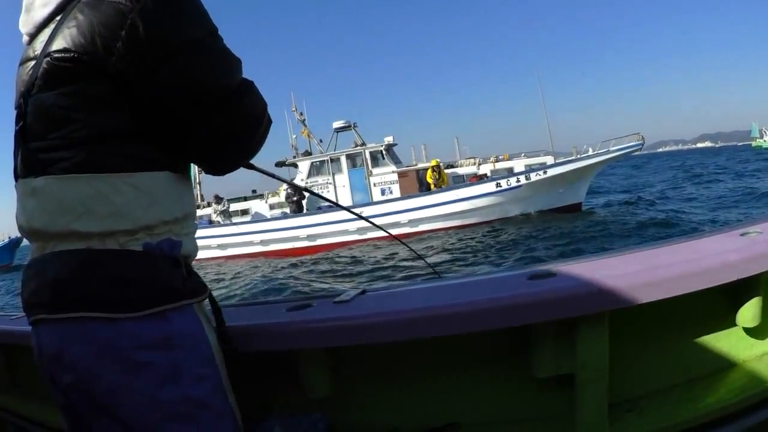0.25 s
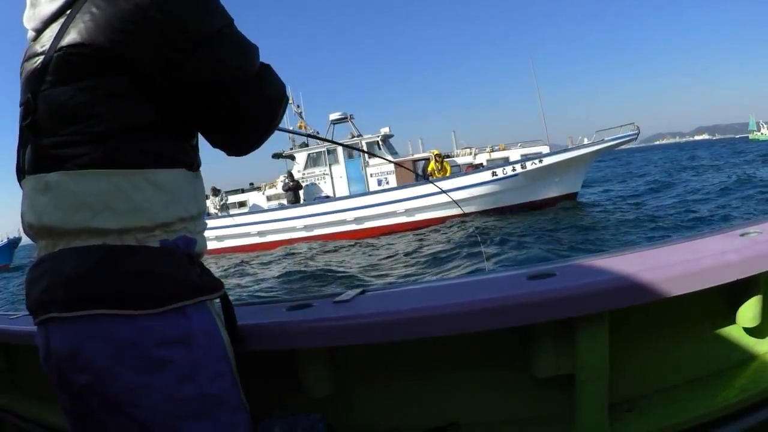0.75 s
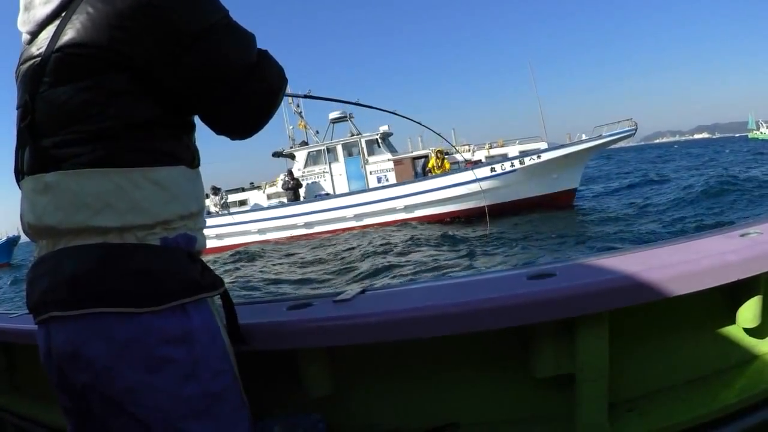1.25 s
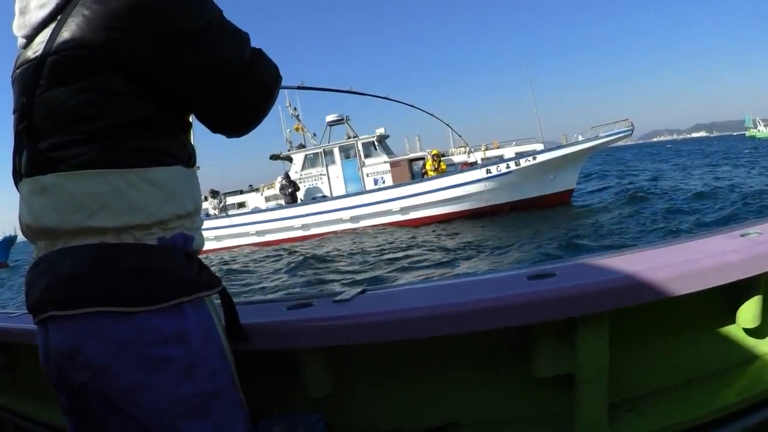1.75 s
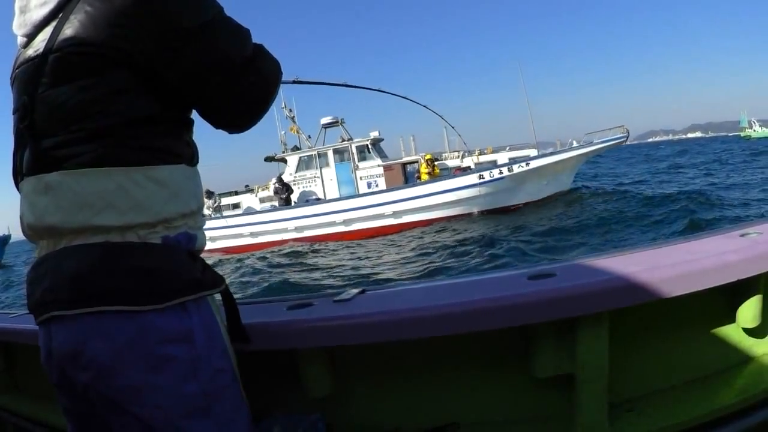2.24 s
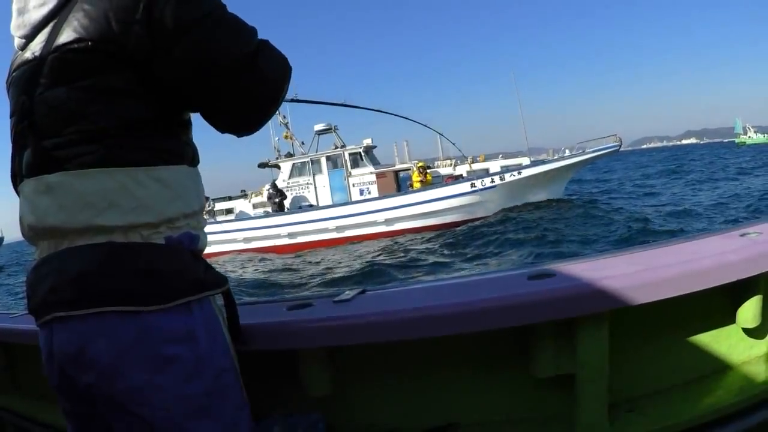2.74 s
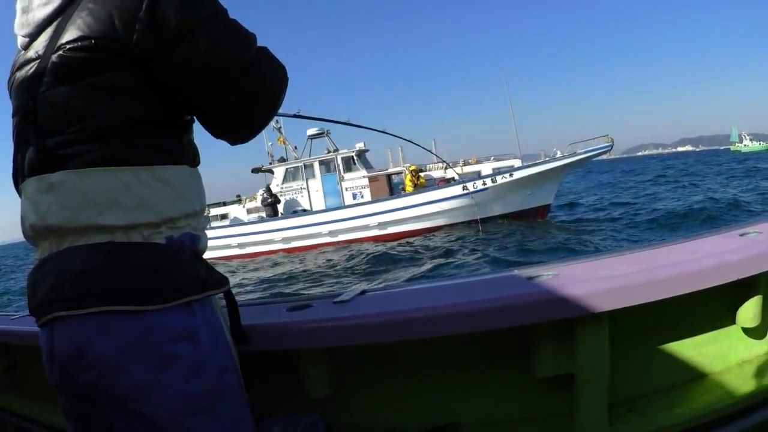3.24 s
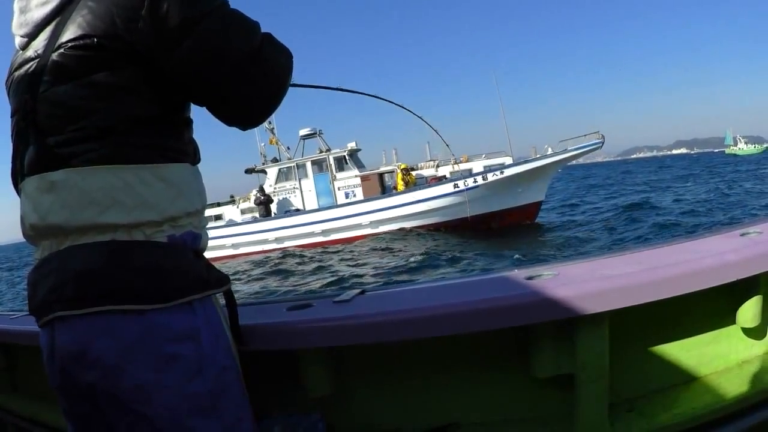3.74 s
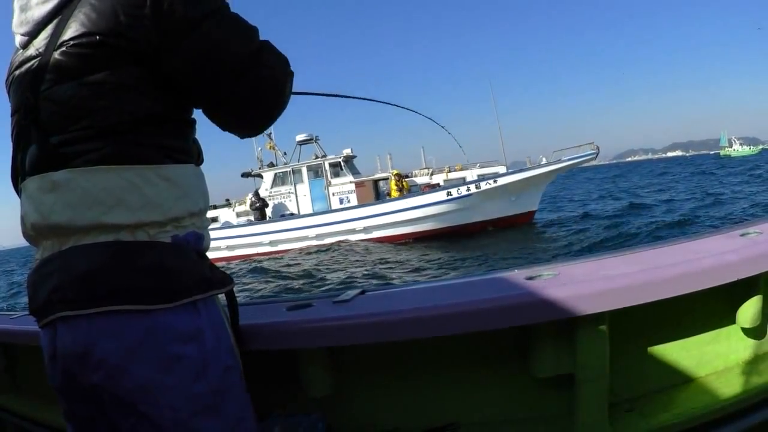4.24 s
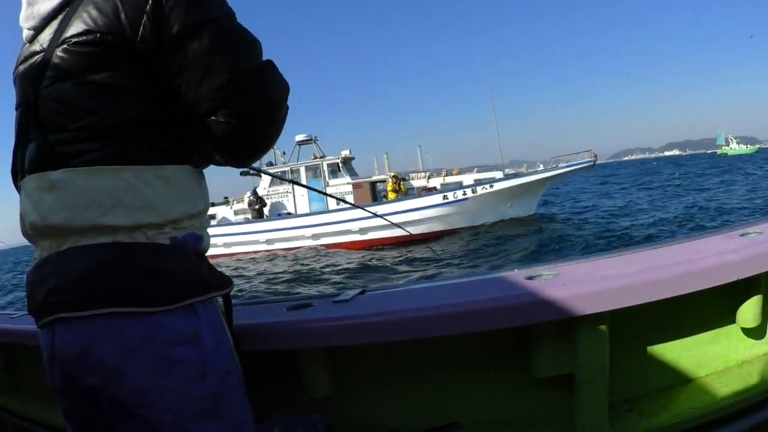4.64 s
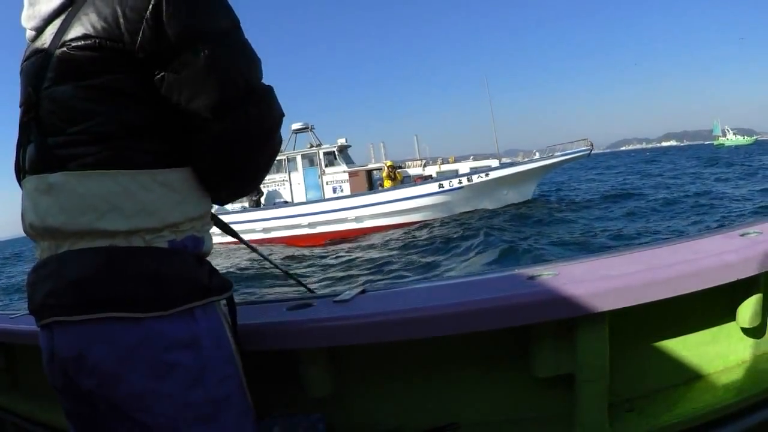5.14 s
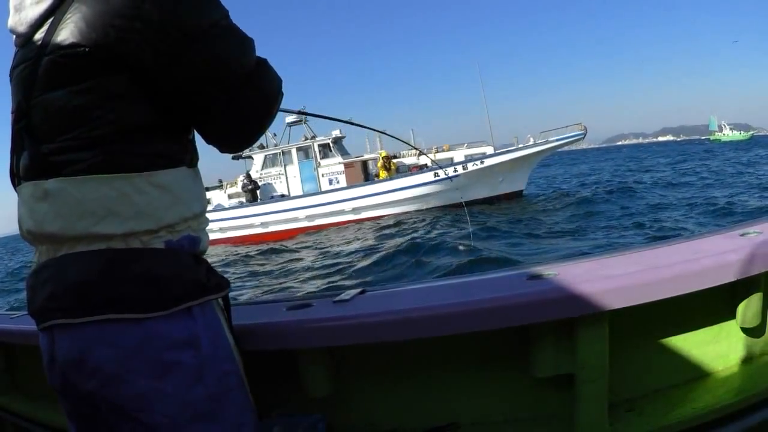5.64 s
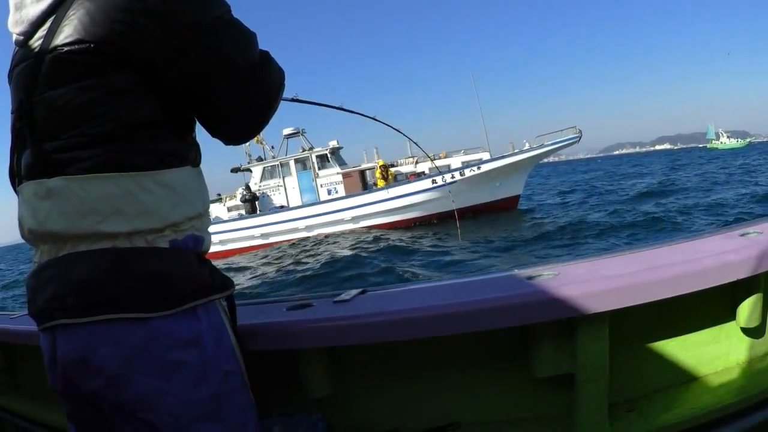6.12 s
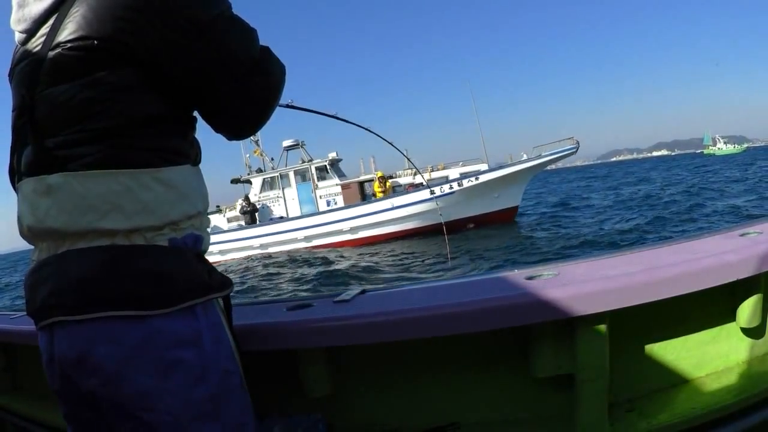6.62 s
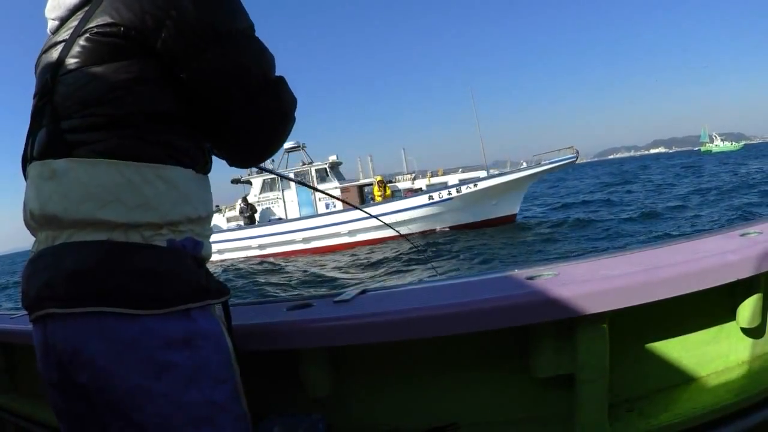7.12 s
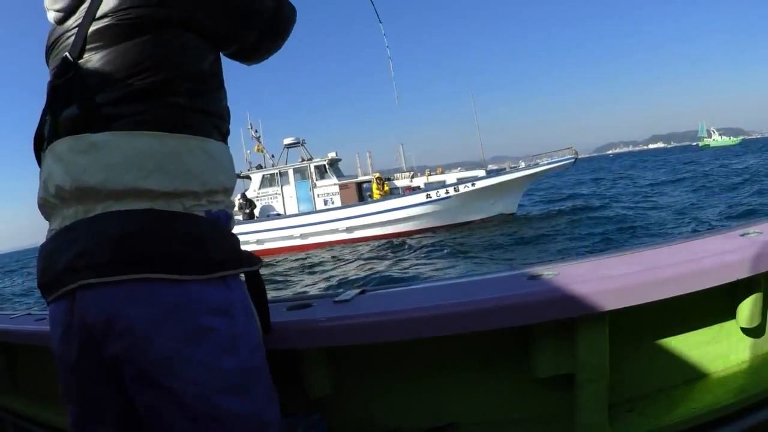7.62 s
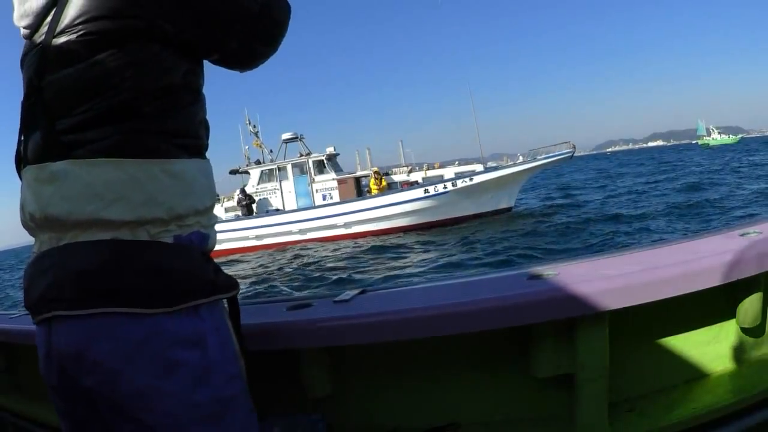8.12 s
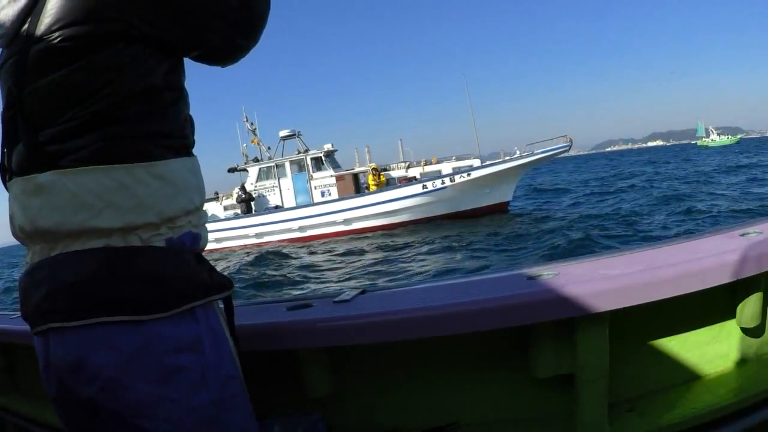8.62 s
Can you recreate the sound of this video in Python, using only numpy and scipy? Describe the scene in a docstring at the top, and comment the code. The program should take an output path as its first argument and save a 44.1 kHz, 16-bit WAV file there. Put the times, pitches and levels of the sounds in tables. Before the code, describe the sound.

On an open fishing boat deck, a diesel idles under a heavy low rumble and dull roar of wind and water. Two waves slap the hull early; small tackle ticks sharply. A hard knock comes before four seconds, then the engine shifts into gear and drones steadier. From about five seconds an electric reel whines thinly to the end, with spray hiss and a late rattle. The small microphone is close, bass-heavy and muffled.

```python
"""A fishing boat's diesel idles at sea, then speeds up in gear: sine multiples of the firing rate
and humming hull panels (narrow noise). Wind and water rumble and roar as shaped noise, spray hisses,
waves slap the hull as falling sines, an electric reel whines, tackle ticks, knocks and squeaks.
A small microphone behind a narrow port hears it; its gain control ducks after sharp treble."""
import sys
import numpy as np
from scipy import signal
from scipy.io import wavfile
from scipy.ndimage import uniform_filter1d, minimum_filter1d

SR = 44100
rng = np.random.default_rng(int(sys.argv[2]) if len(sys.argv) > 2 else 0)


def transcribe(signal):
    """Save signal, clipped to [-1, 1], as a 16-bit WAV file at the path in sys.argv[1]."""
    frames = np.atleast_2d(signal).T
    limited = np.clip(frames, -1, 1)
    pcm = np.round(limited * 32767).astype(np.int16)
    wavfile.write(sys.argv[1], SR, pcm)


N = 391166
T = np.arange(N) / SR

# engine, idle to gear to easing throttle: t/s, second multiple of firing rate f/Hz, its level/dB
ENGINE_SPEED = [(0, 45.1, -31.5), (3.68, 45.1, -41), (3.94, 50.6, -29), (4.1, 51.8, -24.5),
                (5.1, 51.8, -27.5), (5.68, 51.8, -31), (6.0, 51.8, -24), (6.3, 51.8, -23),
                (6.65, 51.8, -24.5), (8.15, 51.8, -24), (8.36, 50.6, -29), (8.87, 49.3, -35)]
# microphone port response: f/Hz, gain/dB
PORT_RESPONSE = [(4000, 3.5), (5000, 13.5), (6300, 10.5), (7200, 13.5), (8300, -5.5), (9000, 2),
                 (9900, -8.5), (10800, -3), (12300, -3), (13300, -37.5), (14300, -1.5), (15700, -10)]


def amp(db):
    """Gain of a level in dB."""
    return 10 ** (np.asarray(db) / 20)


def unit(x):
    """Scales to rms 1."""
    return x / np.sqrt(np.mean(x ** 2) + 1e-20)


def read(points, hz):
    """Value of a spectrum at hz, interpolated over log frequency."""
    f, value = np.transpose(points)
    return np.interp(np.log(hz + 1), np.log(f + 1), value)


def curves(rows, t):
    """Columns of a table, interpolated at the times t."""
    s, *columns = np.transpose(rows)
    return [np.interp(t, s, c) for c in columns]


def smooth(x, span):
    """Two moving averages over span samples."""
    return uniform_filter1d(uniform_filter1d(x, size=span), size=span)


def in_gear(t):
    """0 at idle, 1 in gear, judged from the second multiple of the firing rate."""
    idle_hz, gear_hz = 45.2, 48.5
    return np.clip((curves(ENGINE_SPEED, t)[0] - idle_hz) / (gear_hz - idle_hz), 0, 1)


def add(mix, s, sound):
    """Mixes a sound in at s seconds, cut at the end of the mix."""
    part = mix[round(s * SR):][:len(sound)]
    part += sound[:len(part)]


def fuzzy_tone(hz, width_hz, size=N):
    """Narrow noise of rms 1 that follows the curve hz: slow complex noise on a carrier."""
    r = np.exp(-np.pi * width_hz / SR)
    noise = rng.standard_normal(size) + 1j * rng.standard_normal(size)
    slow = signal.lfilter([1], [1, -2 * r, r * r], noise)
    carrier = np.exp(2j * np.pi * np.cumsum(hz + np.zeros(size)) / SR)
    return unit((slow * carrier).real)


def wash(shape_db, size, patchy_db, flicker_db):
    """Noise of rms 1 and spectrum shape_db(hz, t), even in power but for random patches and wide flicker."""
    hop = size // 4
    t, hz = np.arange(N // hop + 5) * hop / SR, np.fft.rfftfreq(size, 1 / SR)
    a, b, patches = rng.standard_normal((len(t), len(hz), 3)).T
    patches = uniform_filter1d(patches, size=8, axis=0)
    patches = unit(uniform_filter1d(patches, size=8, axis=1))
    flicker = unit(uniform_filter1d(rng.standard_normal(len(t)), size=4))
    shape = amp(shape_db(hz[:, None], t))
    shape = shape / np.sqrt((shape ** 2).sum(0))  # equal power in every frame
    frames = (a + 1j * b) * shape * amp(patchy_db * patches + flicker_db * flicker)
    return unit(signal.istft(frames, nperseg=size, noverlap=size - hop)[1][:N])


def deck():
    """Wind and water: rumble and roar change colour in gear; the roar throbs at the firing rate."""
    # t/s, hull rumble level/dB, roar level/dB
    deck_levels = [(0, -16.5, -16.5), (1.2, -17.5, -17), (1.58, -18, -19.5), (1.7, -18, -18),
                   (3.05, -16.5, -17), (3.64, -16.5, -17), (3.672, -21, -17), (3.75, -16, -17.5),
                   (3.85, -20.5, -21), (4.1, -23, -22.5), (4.45, -19.5, -24), (4.8, -24, -24.5),
                   (5.18, -17, -21), (5.62, -19.5, -22), (6.05, -17, -20.5), (6.3, -19.5, -22.5),
                   (6.8, -21, -22), (7.4, -19, -20.5), (7.5, -20.5, -22), (7.8, -21.5, -21),
                   (8.4, -18.5, -22), (8.87, -21.5, -22)]
    # spectra at idle and in gear: f/Hz, relative density/dB per Hz
    rumble_idle = [(18, -51), (30, -14), (80, -8.5), (146, -4.5), (216, -0.5), (347, -12.5), (400, -12),
                   (520, -36.5), (880, -120)]
    rumble_gear = [(20, -48), (36, -33), (46, -3), (62, -2), (72, -24), (97, -1), (124, 1), (156, -1),
                   (296, -3), (340, -16.5), (400, -15), (520, -58)]
    roar_idle = [(180, -25), (300, -2.5), (396, -16), (438, -6), (572, -6), (647, -6.5), (765, -2),
                 (874, -9), (1120, -10), (1840, -19.5), (2130, -23), (2720, -29), (4300, -48.5),
                 (5590, -88.5), (9460, -120)]
    roar_gear = [(180, -23), (300, -4.5), (347, -13), (479, -8.5), (512, -8.5), (605, -11.5), (669, -8.5),
                 (914, -13.5), (1260, -15.5), (2850, -31.5), (4300, -62), (5590, -97), (9460, -120)]
    gust_s, gust_rms_db, throb_depth = 0.038, 0.6, 0.058

    def blend(idle, gear):
        return lambda hz, t: read(idle, hz) + in_gear(t) * (read(gear, hz) - read(idle, hz))

    rumble_db, roar_db = curves(deck_levels, T)
    gust_db = gust_rms_db * unit(smooth(rng.standard_normal(N), round(gust_s * SR)))
    throb = 1 + throb_depth * np.cos(np.pi * np.cumsum(curves(ENGINE_SPEED, T)[0]) / SR)
    rumble = wash(blend(rumble_idle, rumble_gear), size=4096, patchy_db=0.37, flicker_db=1.23)
    roar = wash(blend(roar_idle, roar_gear), size=1024, patchy_db=0.33, flicker_db=0.46)
    return amp(gust_db) * (amp(rumble_db) * rumble + amp(roar_db) * roar * throb)


def hiss():
    """Spray, line and rod: wide hiss with a softer top octave, a rod swish and fine random drops."""
    # t/s, hiss level/dB
    hiss_levels = [(0, -47), (.35, -51.5), (1.7, -51.5), (2.3, -49), (2.75, -52.5), (3.4, -49.5),
                   (3.75, -54.5), (4.35, -58), (4.65, -55), (4.85, -56), (5.9, -43.5), (6.5, -48.5),
                   (6.95, -45), (7.8, -45.5), (8.3, -45.5), (8.5, -48.5), (8.87, -45.5)]
    # upward swish of the rod: t/s, rise/dB, width/s
    rod_swish = (7.47, 10, .065)
    top_octave_db, sea_db, sea_share = -1.5, -54, 0.74
    drops_per_s, drop_decay_samples = 60, 250

    def level_db(t):
        s, rise_db, width_s = rod_swish
        return curves(hiss_levels, t)[0] + rise_db * np.exp(-((t - s) / width_s) ** 2)

    def tilt(hz, t):
        # the low hiss of the sea swells less
        sea = sea_share * (sea_db - level_db(t)) * np.clip((6000 - hz) / 600, 0, 1)
        top = top_octave_db * np.clip((hz - 9000) / 1500, 0, 1)
        low_cut = -30 * np.clip((3800 - hz) / 1500, 0, 3)
        return sea + top + low_cut

    drop_gain = amp(1.6 * np.minimum(rng.exponential(1, N), 4))
    drops = drop_gain * (rng.random(N) < drops_per_s / SR)
    spatter = 1 + 0.39 * signal.lfilter([1], [1, -np.exp(-1 / drop_decay_samples)], drops)
    return amp(level_db(T)) * wash(tilt, size=256, patchy_db=0.7, flicker_db=0.5) * spatter


def slaps():
    """Waves slap the hull: the trapped water pocket grows, so each decaying sine drops quickly in pitch."""
    # t/s, peak/dB, final pitch f/Hz, t60/s
    wave_slaps = [(1.429, -9, 170, 0.044), (1.4629, -0.5, 217, 0.11), (5.219, -6, 193, 0.055),
                  (5.978, -13, 149, .04)]
    out, t = np.zeros(N), np.arange(4000) / SR
    for s, db, hz, t60_s in wave_slaps:
        turns = np.cumsum(hz + 450 * np.exp(-t / 0.0016)) / SR
        attack = np.minimum(t / 0.00039, 1)
        add(out, s, amp(db - 60 * t / t60_s) * attack * np.sin(2 * np.pi * turns))
    return out


def knocks():
    """Tackle knocks and scrapes as decaying narrow noise, and a squeak as a few harmonics."""
    # t/s, level/dB, f/Hz, width/Hz, t60/s
    tackle_knocks = [(3.39, -29.5, 2960, 600, 0.13), (3.716, -13, 1132, 890, 0.24),
                     (4.165, -41, 4700, 1200, .1), (6.12, -34, 2920, 200, .08),
                     (8.422, -37, 3430, 1500, .09), (8.422, -23, 2240, 895, 0.071),
                     (8.44, -23, 2630, 1100, 0.1), (8.44, -42, 3510, 1000, 0.072)]
    # t/s, length/s, fundamental f/Hz
    squeak = (.742, .07, 622)
    # multiple of the fundamental, level/dB
    squeak_multiples = [(3, -27.5), (4, -44), (5, -44)]
    out, t = np.zeros(N), np.arange(12000) / SR
    for s, db, hz, width_hz, t60_s in tackle_knocks:
        envelope = amp(db - 60 * t / t60_s) * np.minimum(t / (0.023 * t60_s), 1)
        add(out, s, envelope * fuzzy_tone(hz, width_hz, size=len(t)))
    s, length_s, hz = squeak
    t = np.arange(0, length_s, 1 / SR)
    tone = sum(amp(db) * np.sin(2 * np.pi * k * hz * t) for k, db in squeak_multiples)
    add(out, s, signal.windows.tukey(len(t), .4) * tone)
    return out


def ticks():
    """Tackle and drops near the port: a 1.4 ms ringing snap, brighter when harder, then a duller rattle."""
    # t/s, snap level/dB, ring f/Hz, rattle level/dB
    port_ticks = [(0.1082, -31, 6630, -43.5), (1.5434, -32, 6900, -32), (1.6003, -32, 7390, -39.5),
                  (1.8936, -29, 7400, -36), (2.1755, -35.5, 6770, -44), (2.4039, -34, 7350, -37),
                  (2.7367, -31.5, 7100, -34), (3.2705, -31, 7400, -45.5), (3.6578, -13.5, 8000, -22),
                  (4.163, -18, 14360, -35), (4.6029, -37, 6680, -42), (6.2193, -37, 7300, -38.5),
                  (6.7256, -36.5, 7100, -41.5), (6.7894, -30, 7140, -40.5), (7.637, -37, 7210, -42),
                  (7.8506, -36.5, 7260, -38.5), (8.09, -33, 7380, -35), (8.1843, -36, 7100, -39.5),
                  (8.422, -30.5, 6990, -24), (8.4394, -28, 6980, -32), (8.7316, -37.5, 7250, -45)]
    rattle_t60_s, hard_db, longer_s_per_db = 0.0855, -20, 0.007125  # harder snaps rattle longer
    out, t = np.zeros(N), np.arange(6000) / SR
    noises = rng.standard_normal((len(port_ticks), len(t)))
    short = np.exp(-(t / .0014) ** 4)
    attack = np.minimum(t / 0.00014, 1)
    for (s, db, hz, rattle_db), noise in zip(port_ticks, noises):
        ring = amp(-read(PORT_RESPONSE, hz)) * np.sin(2 * np.pi * hz * t)  # offsets the port gain
        bright = amp(.5 * (db + 10.0)) * np.diff(np.diff(noise, prepend=0), prepend=0)
        snap = amp(db) * short * (ring + 0.3 * bright)
        t60_s = rattle_t60_s + longer_s_per_db * max(db - hard_db, 0)
        dull = np.diff(uniform_filter1d(noise, size=3), prepend=0)
        rattle = amp(rattle_db - 60 * t / t60_s) * dull
        add(out, s, attack * (snap + rattle))
    return out


def reel():
    """Reel motor: a thin gear-mesh whine, noise bands at multiples of it, spool hum and case buzz."""
    # mesh pitch sags under each pull, creeps up as the load lightens: t/s, mesh f/Hz, level/dB
    mesh = [(5.05, 3117, -57), (5.2, 3400, -58), (5.34, 3400, -49), (5.52, 3362, -43), (5.68, 3420, -50),
            (6.03, 3464, -48), (6.3, 3445, -49), (6.44, 3402, -47), (6.92, 3475, -47.5), (7.05, 3451, -47),
            (7.4, 3505, -48), (7.7, 3498, -49.5), (8.07, 3535, -49), (8.25, 3505, -48), (8.68, 3528, -48.5),
            (8.87, 3500, -47.5)]
    # fuzzy bands: multiple of mesh pitch, width/Hz, level relative to the smoothed mesh/dB
    mesh_bands = [(1.07, 120, -27.5), (2.06, 90, -11), (2.6, 300, -8), (3.07, 300, -9)]
    # blurred spool hum under load: t/s, f/Hz, level/dB
    spool = [(5.3, 2230, -58), (5.7, 2260, -43), (7.15, 2275, -43), (7.5, 2260, -58), (8.87, 2260, -62)]
    # t/s, case noise level/dB
    case_levels = [(4.9, -51), (5.5, -49), (5.8, -39.5), (6.4, -42.5), (7.05, -40.5), (7.4, -41),
                   (8.3, -44), (8.55, -47), (8.87, -51)]

    def case_shape(f, t):
        return -16 * abs(np.log2((f + 1) / 2300)) ** 2 + 0 * t

    hz, db = curves(mesh, T)
    hz = hz + 6 * unit(smooth(rng.standard_normal(N), 3000))  # wander, 6 Hz rms
    on = np.clip((T - mesh[0][0]) / 0.088, 0, 1)
    out = amp(db) * (1.05 * np.sin(2 * np.pi * np.cumsum(hz) / SR) + 0.32 * fuzzy_tone(hz, 52))
    loaded = np.clip((T - 5.3) / 0.5, .2, 1)  # bands grow as the line goes taut
    steady_db = uniform_filter1d(db, size=30000)
    for k, width_hz, band_db in mesh_bands:
        out += amp(steady_db + band_db) * loaded * fuzzy_tone(k * hz, width_hz)
    spool_hz, spool_db = curves(spool, T)
    out += amp(spool_db) * fuzzy_tone(spool_hz, 94)
    case = wash(case_shape, size=512, patchy_db=3.0, flicker_db=-1.5)
    out += amp(curves(case_levels, T)[0]) * case
    return on * out


def engine():
    """Diesel: clean low multiples of the firing rate, and hull panels humming around fixed pitches."""
    # other multiples: multiple of firing rate, level at idle/dB, level in gear/dB
    orders = [(1, -56, -56), (3, -37, -40), (5, -30, -27), (6, -41, -51)]
    # seventh multiple, booming in swells at idle: t/s, level/dB
    boom = [(0, -19), (.5, -44), (1, -22), (1.4, -21), (1.75, -31), (2, -28), (2.75, -38), (3, -23),
            (3.5, -18), (3.7, -25), (8.87, -63)]
    # panels shaken by the engine: f/Hz, width/Hz, level at idle/dB, level in gear/dB
    panels = [(80.7, 6.1, -30, -29.5), (128.5, 9, -25.5, -36), (146.5, 24, -23.5, -50), (195, 11, -26, -41),
              (316, 12.5, -44, -38), (392.8, 5.7, -32, -44.5), (544, 23.5, -31.5, -35),
              (604.4, 39, -31, -57), (756, 25, -30, -40), (1265, 31, -59, -59), (1840, 39, -44, -46.5)]
    second_hz, second_db = curves(ENGINE_SPEED, T)
    gear, firings = in_gear(T), np.cumsum(second_hz / 2) / SR
    levels = [(2, second_db), (7, curves(boom, T)[0])]
    levels += [(k, idle_db + gear * (gear_db - idle_db)) for k, idle_db, gear_db in orders]
    out = np.zeros(N)
    for k, rms_db in levels:
        out += np.sqrt(2) * amp(rms_db) * np.sin(2 * np.pi * (k * firings + rng.random()))
    for f, width_hz, idle_db, gear_db in panels:
        out += amp(idle_db + gear * (gear_db - idle_db)) * fuzzy_tone(f, width_hz)
    return out


def scene():
    """Everything reaches both capsules alike."""
    mix = deck() + hiss() + slaps() + knocks() + ticks() + reel() + engine()
    return np.array([mix, mix])


def port(dry):
    """Narrow port: a causal minimum-phase filter and two nulls, one narrow, one wide."""
    # f/Hz, width/Hz
    port_nulls = [(4550, 740), (5700, 2980)]
    hz = np.fft.rfftfreq(4096, 1 / SR)
    log_gain = np.log(amp(read(PORT_RESPONSE, hz)))
    log_gain = np.concatenate([log_gain, log_gain[-2:0:-1]])
    taps = np.fft.ifft(np.exp(np.conj(signal.hilbert(log_gain)))).real[:2048]
    heard = signal.oaconvolve(dry, taps[None])[:, :N]
    for null_hz, width_hz in port_nulls:
        heard = signal.lfilter(*signal.iirnotch(null_hz, null_hz / width_hz, SR), heard)
    return heard


def duck(heard):
    """Gain control: treble over a threshold lowers the gain, which then recovers steadily in dB."""
    threshold_db, share, held_fall_db_per_s = -48, .47, 110
    treble = signal.lfilter(*signal.butter(2, 4500, "high", fs=SR), heard[0])
    power_db = 10 * np.log10(signal.lfilter([.006], [1, -.994], treble ** 2) + 1e-12)
    fall_db = T * held_fall_db_per_s
    held_db = np.maximum.accumulate(power_db + fall_db) - fall_db
    over_db = np.maximum(held_db - threshold_db, 0)
    return heard / amp(share * uniform_filter1d(over_db, size=300, origin=149))  # averages the past


def amplifier_noise():
    """Steady shaped hiss of the microphone amplifier."""
    # f/Hz, relative density/dB per Hz
    self_noise = [(3000, -39.5), (8000, -12.5), (13000, -14), (15700, 1.5)]
    level_db = -64
    return amp(level_db) * wash(lambda f, t: read(self_noise, f) + 0 * t, size=512, patchy_db=1.5, flicker_db=0)


def limit(heard):
    """Limiter: a smoothed gain eases the highest peaks down."""
    gain = np.minimum(.9 / (abs(heard[0]) + 1e-9), 1)
    return heard * smooth(minimum_filter1d(gain, size=601), 300)


def record(dry):
    """Port, treble ducking, amplifier noise, limiter, capsules unequal in the bass, band limit."""
    edge_hz, bass_share = 15760, .047
    heard = limit(duck(port(dry)) + amplifier_noise())
    bass = signal.lfilter(*signal.butter(1, 380, fs=SR), heard[0])
    bass = bass_share * signal.oaconvolve(bass, signal.firwin(801, 800, fs=SR), "same")
    pair = heard + np.array([-bass, bass])
    band = signal.firwin(1023, edge_hz, window=("kaiser", 10), fs=SR)
    return signal.oaconvolve(pair, band[None], "same")


dry = scene()
out = record(dry)
transcribe(out)
```